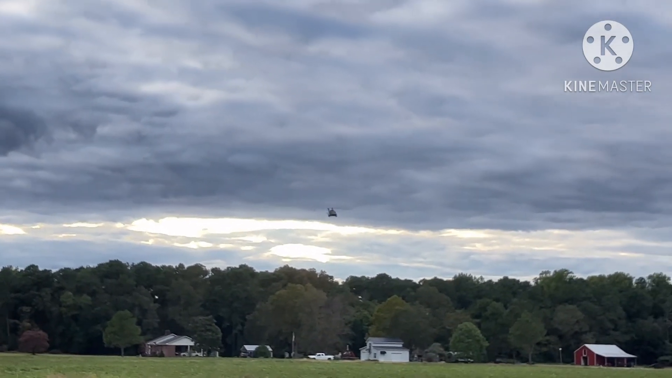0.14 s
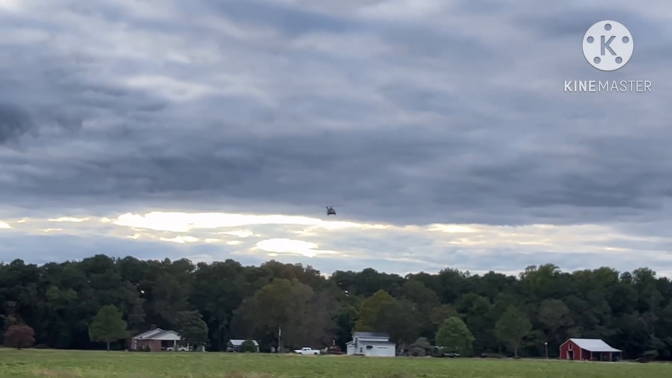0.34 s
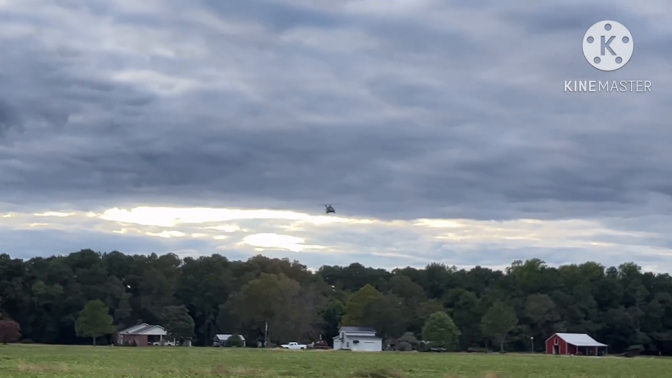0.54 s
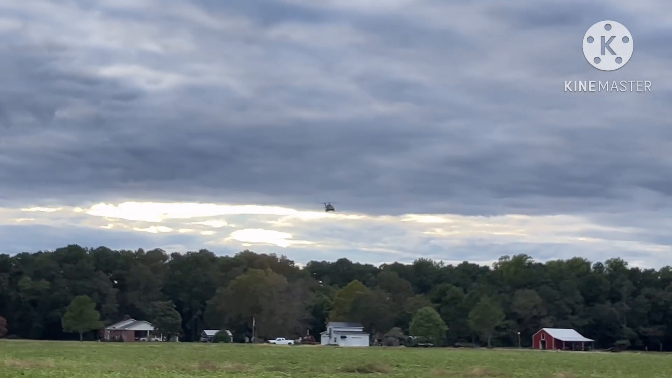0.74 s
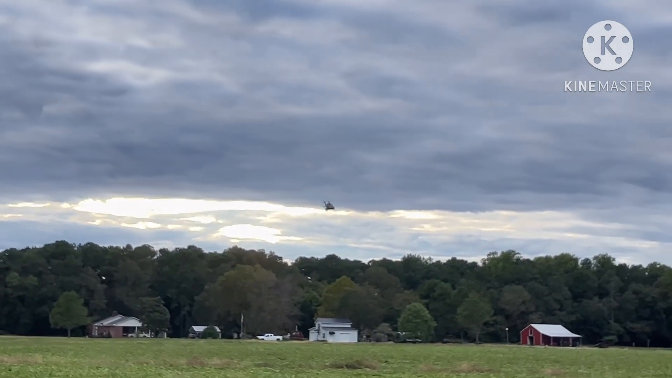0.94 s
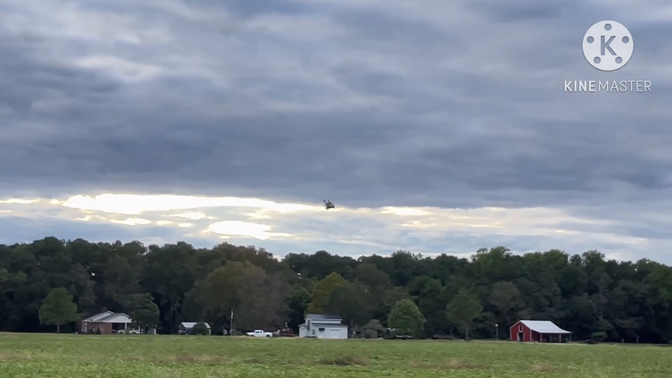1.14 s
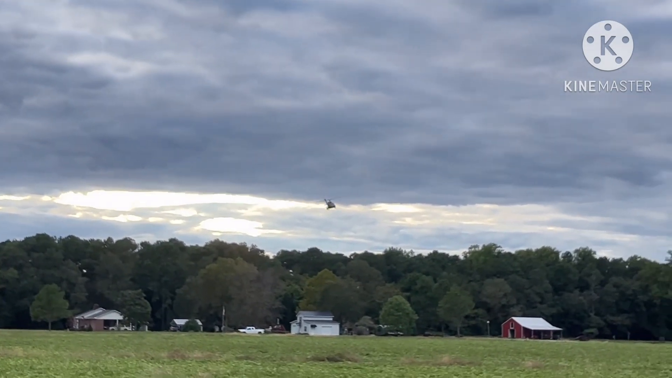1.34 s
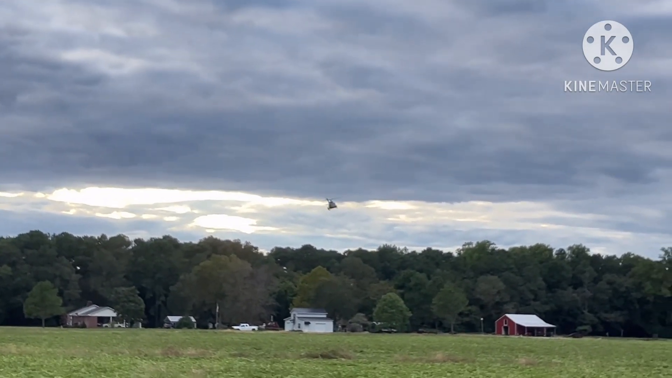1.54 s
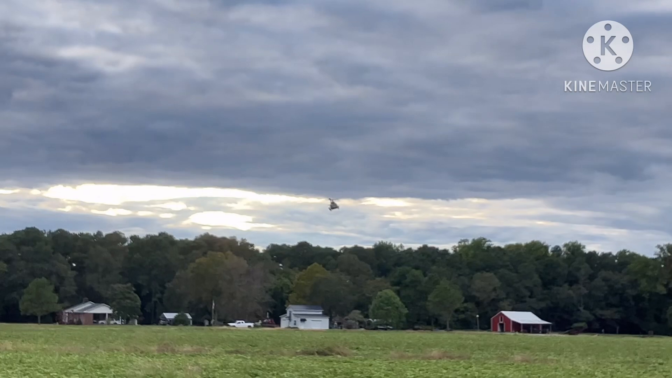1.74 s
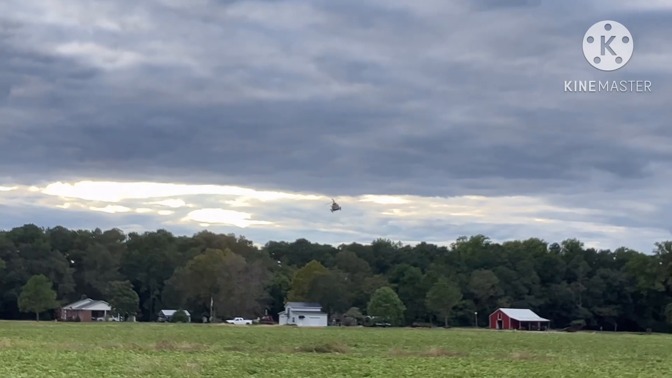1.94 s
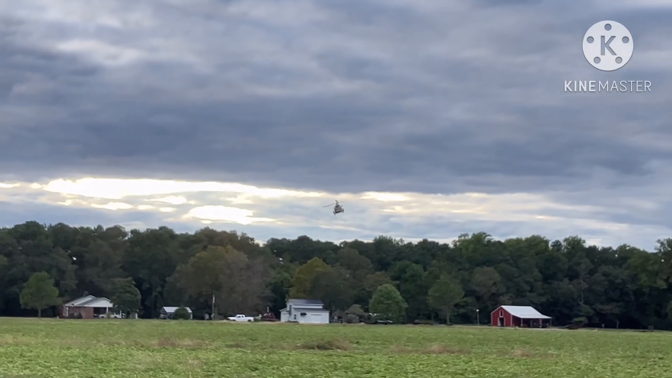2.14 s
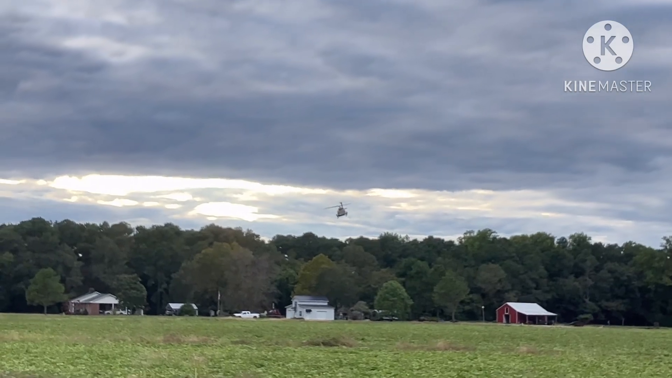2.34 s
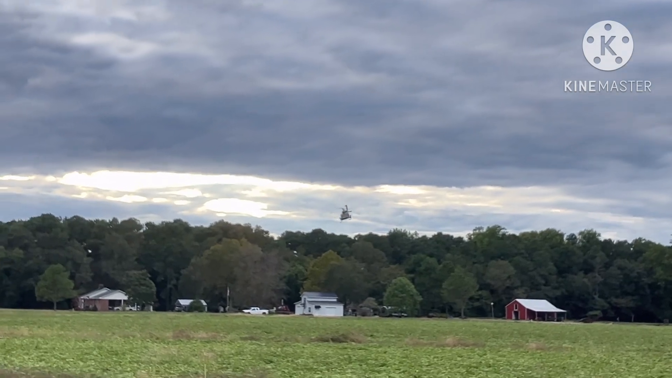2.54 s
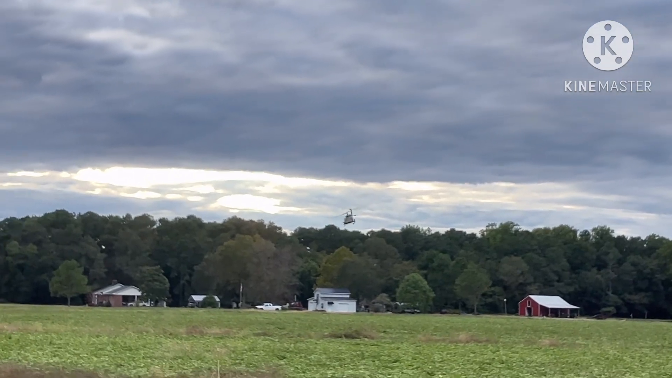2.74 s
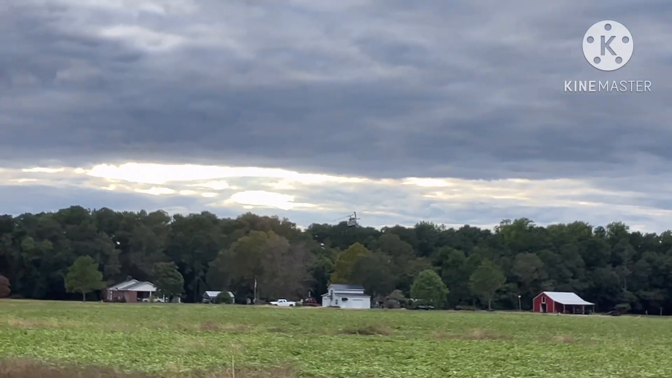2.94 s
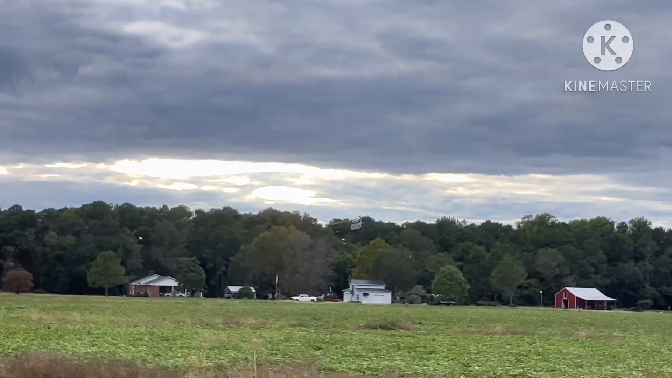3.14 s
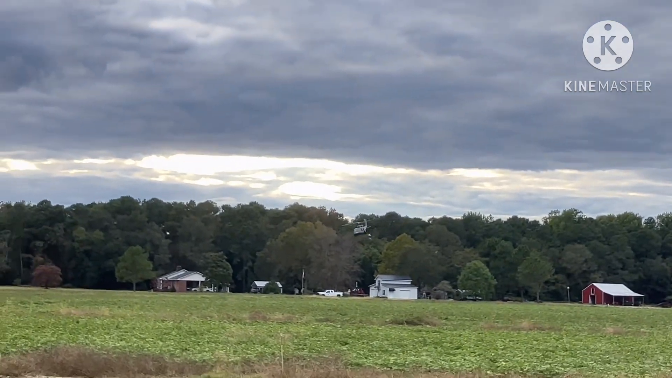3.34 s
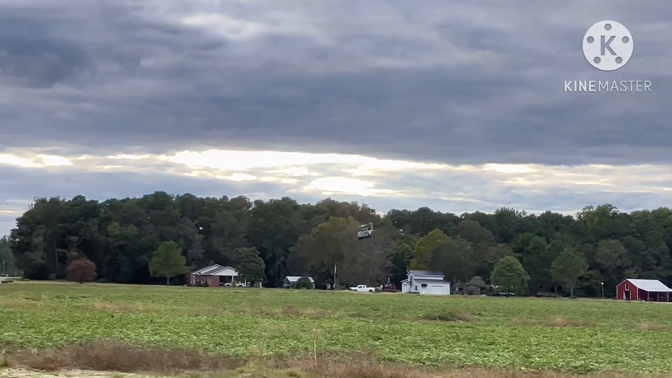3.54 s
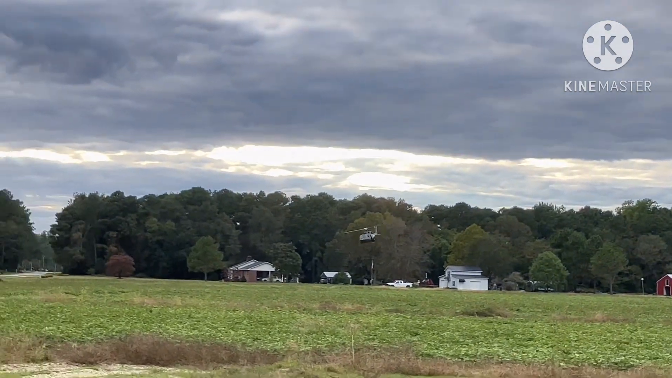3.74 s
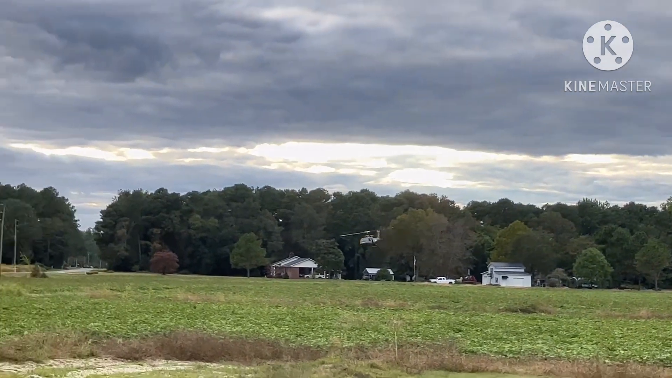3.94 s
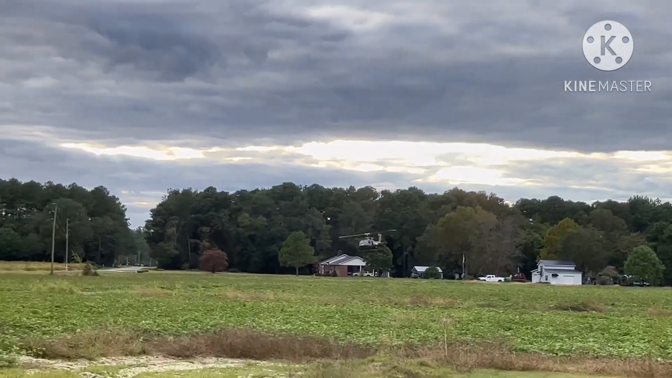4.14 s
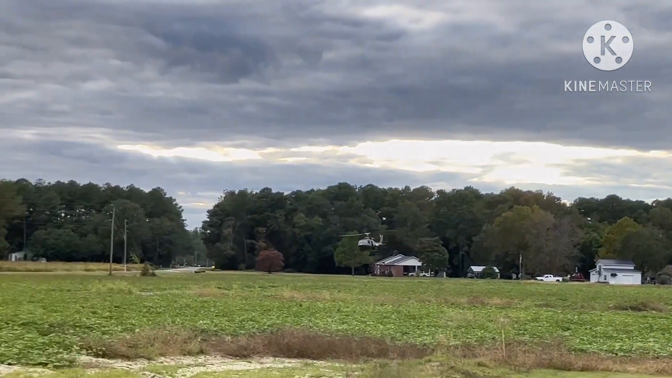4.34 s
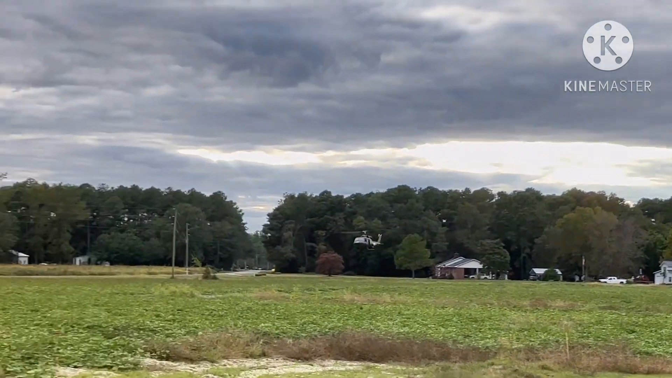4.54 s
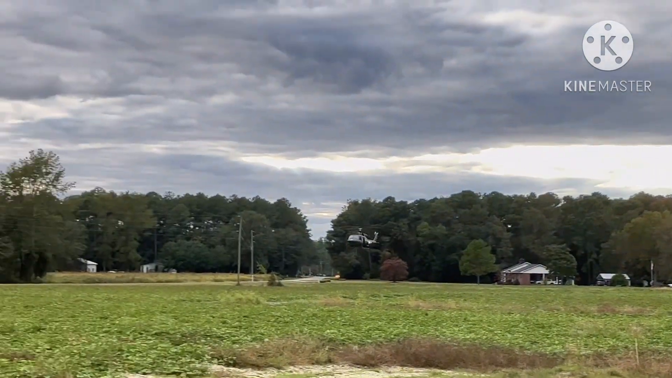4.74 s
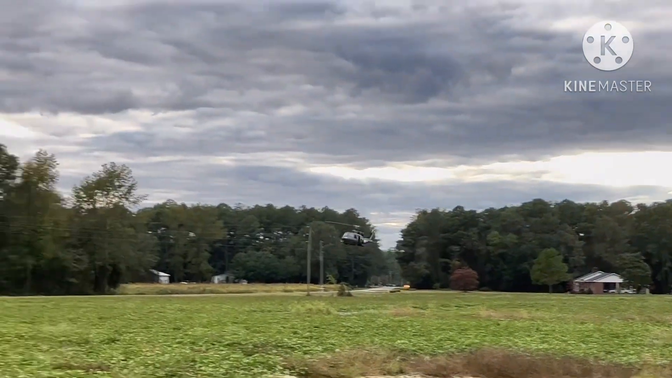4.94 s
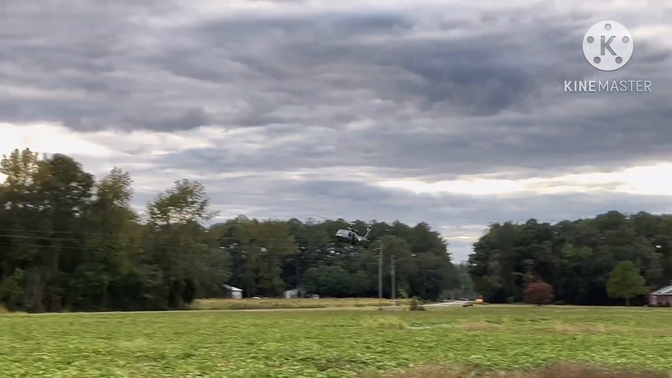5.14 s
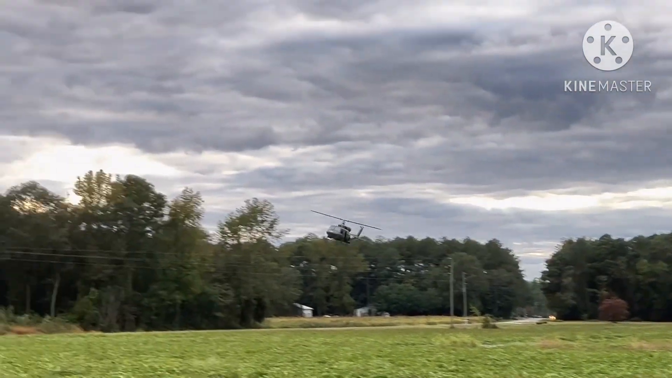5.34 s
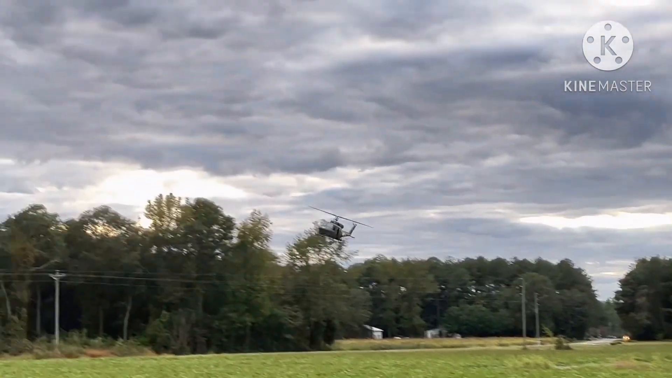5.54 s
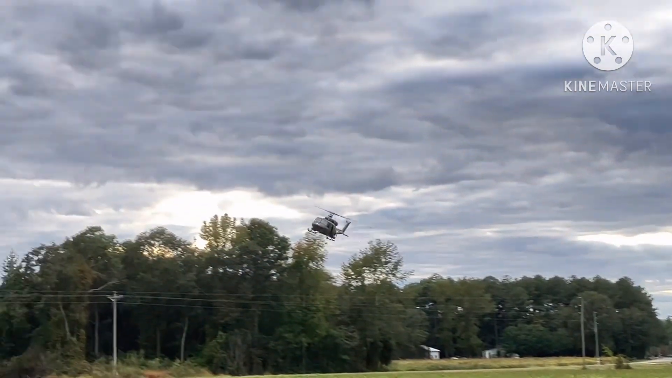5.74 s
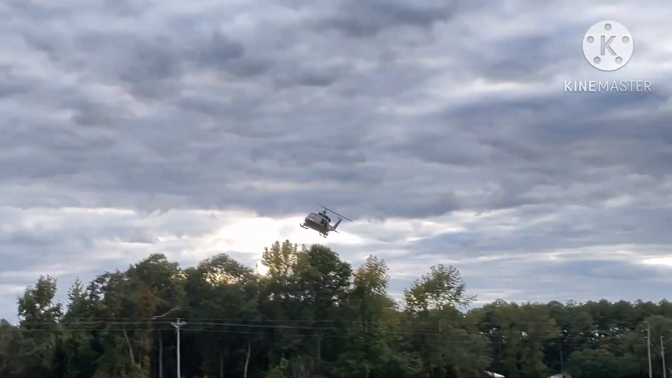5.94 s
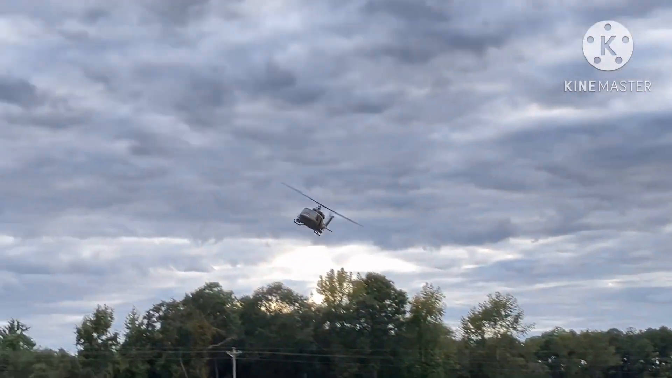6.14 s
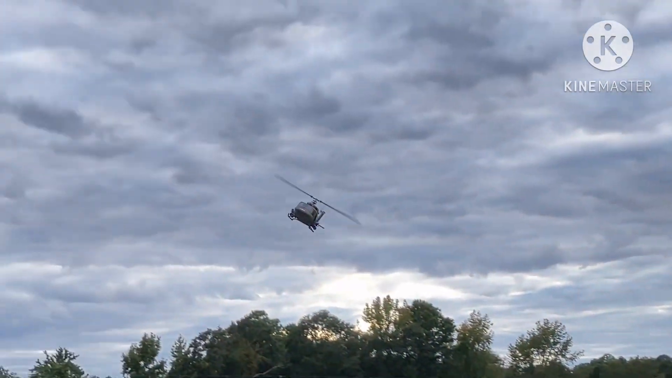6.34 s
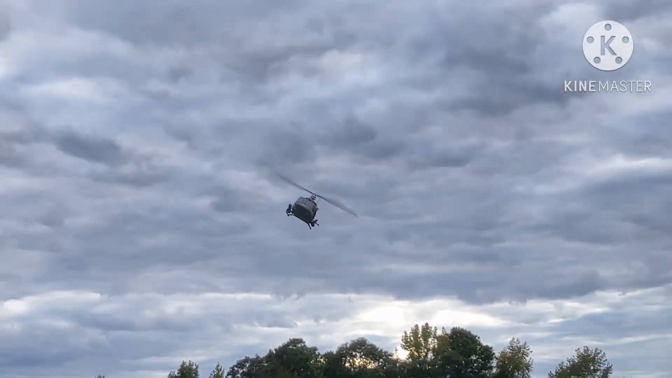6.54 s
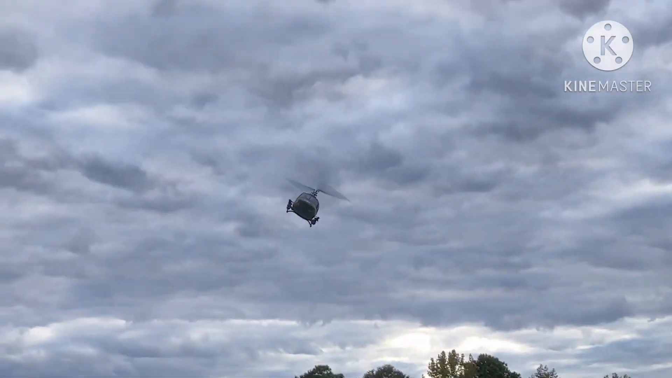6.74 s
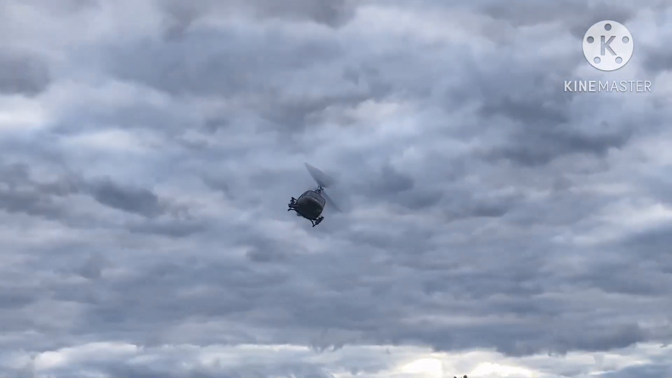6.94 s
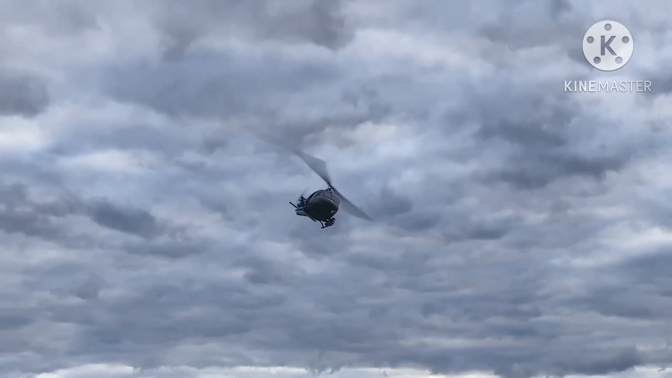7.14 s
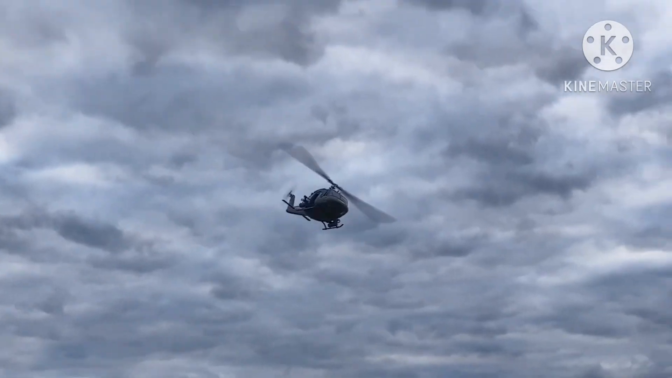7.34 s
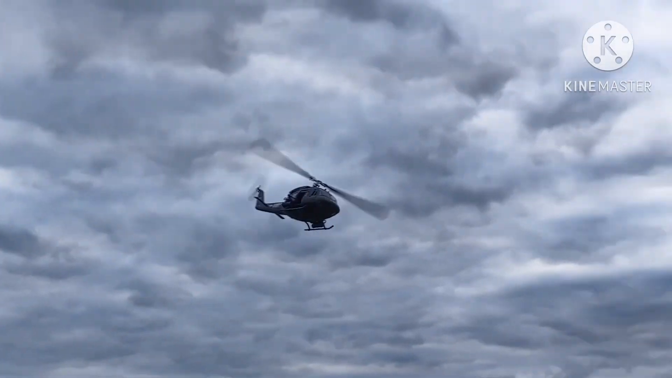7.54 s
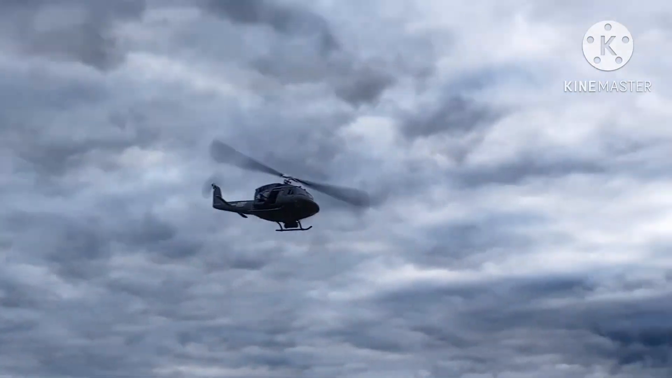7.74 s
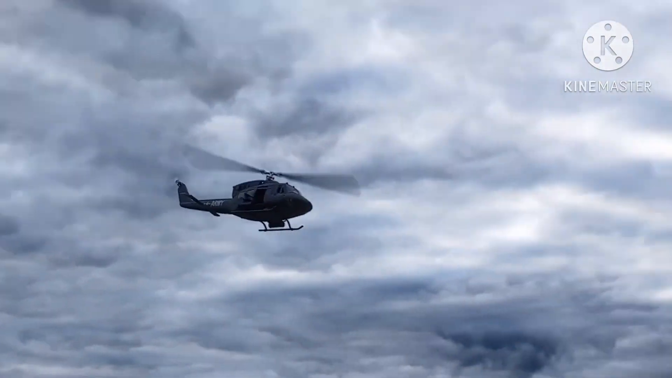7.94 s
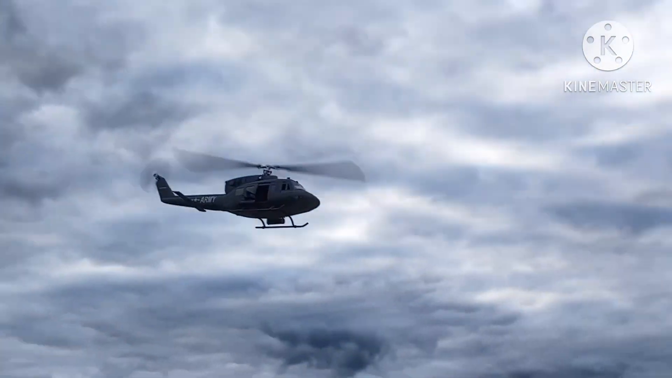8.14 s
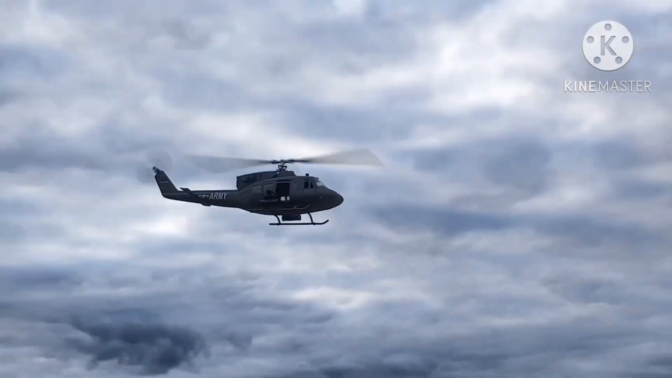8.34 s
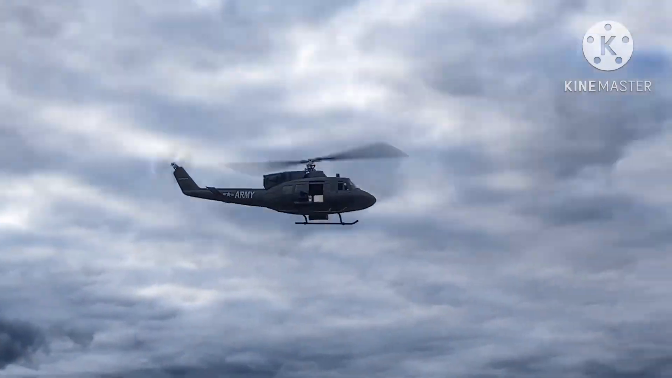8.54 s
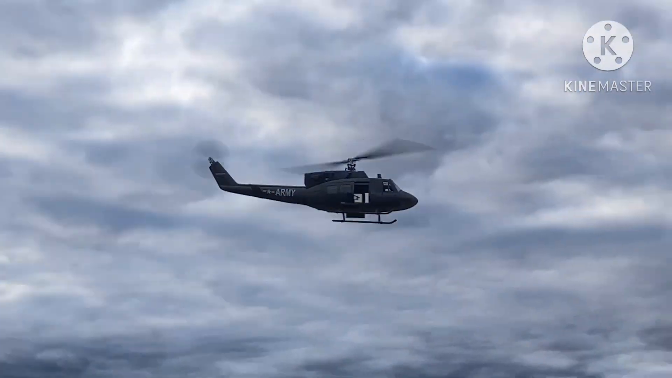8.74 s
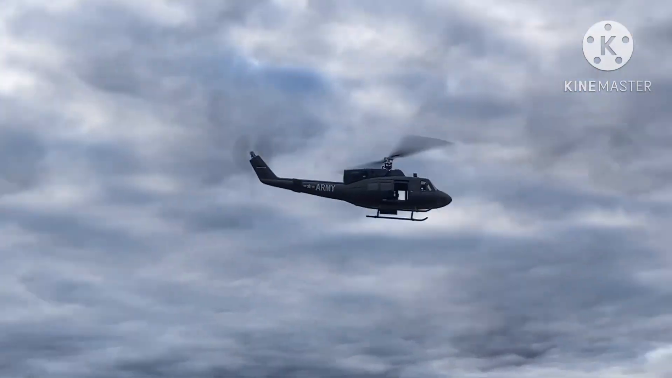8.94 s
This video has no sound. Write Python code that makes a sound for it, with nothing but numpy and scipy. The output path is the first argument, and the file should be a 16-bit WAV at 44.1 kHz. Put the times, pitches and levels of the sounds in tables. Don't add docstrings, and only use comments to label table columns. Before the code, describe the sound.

Outdoors, a distant small radio-controlled helicopter's steady motor whine and fluttering blade buzz grow steadily nearer, becoming harsh and airy as it sweeps past.

```python
import sys
import numpy as np
from scipy import signal
from scipy.fft import rfft, irfft
from scipy.io import wavfile
from scipy.ndimage import uniform_filter1d, map_coordinates

SR = 44100
rng = np.random.default_rng(int(sys.argv[2]) if len(sys.argv) > 2 else 0)


def volts_from_decibels(level):
    exponent = np.asarray(level, float) / 20
    return 10 ** exponent


def unload_audio(sound):
    columns = np.transpose(np.atleast_2d(sound))
    steps = np.round(np.clip(columns, -1, 1) * 32767)
    wavfile.write(sys.argv[1], SR, steps.astype(np.int16))


N = 396900
MOTOR, TAIL = 10.735, 4.5025

# (time [s], nearness [dB], side-on [0-1], motor load [0-1], grass echo delay [ms])
FLIGHT_PATH = [(0.0, 0, 0, 0.01, 1.44), (1.0, 1.2, 0, 0, 1.39), (2.0, 2, 0.02, 0.03, 1.33),
               (2.75, 2.5, 0.02, 0.03, 1.26), (3.5, 4, 0.03, 0.02, 1.08), (4.25, 5.5, 0.07, 0.01, 0.84),
               (4.75, 7, 0.05, 0.03, 0.92), (5.25, 8.5, 0.04, 0.3, 1.23), (5.5, 9.5, 0, 0.6, 1.4),
               (6.25, 10.5, 0, 0.62, 2.53), (6.75, 12, 0, 0.8, 3.12), (7.0, 12, 0.03, 0.98, 3.5),
               (7.5, 13, 0.31, 0.97, 4.135), (7.75, 12, 0.64, 0.9, 4.33), (8.0, 12.5, 0.81, 0.48, 4.35),
               (8.25, 12.5, 0.92, 0.3, 4.3), (8.6, 12.5, 0.98, 0.1, 4.44), (9.0, 12, 0.93, 0.15, 4.57)]


def in_time(rows):
    s, *columns = np.transpose(rows)
    return [np.interp(np.arange(N) / SR, s, c) for c in columns]


def at_hz(hz, points_hz, values):
    return np.interp(np.log(np.maximum(hz, 1)), np.log(points_hz), values)


def rms_one(x):
    return x / np.sqrt(np.mean(x ** 2) + 1e-20)


def drift(rate_hz):
    pole = np.exp(-200 * np.pi * rate_hz / SR)
    noise = rng.standard_normal(N // 100 + 802)
    slow = signal.lfilter([1], [1, -2 * pole, pole * pole], noise)[800:]
    return np.interp(np.arange(N) / 100, np.arange(len(slow)), rms_one(slow))


def breeze():
    # (frequency [Hz], density [dB per Hz])
    rumble_colour = [(25, -8), (60, 3), (100, -1), (160, -3.5), (400, -20), (2000, -26), (9000, -56)]
    # (time [s], peak [dB], pitch [Hz])
    bumps = [
        (1.19, -44, 70),
        (2.37, -38, 80),
        (2.83, -35, 85),
        (6.66, -30, 58),
        (8.97, -32, 55),
    ]
    hz = np.fft.rfftfreq(N, 1 / SR)
    spectrum = rfft(rng.standard_normal(N)) * volts_from_decibels(at_hz(hz, *np.transpose(rumble_colour)))
    out = rms_one(irfft(spectrum, N)) * volts_from_decibels(-56 + 4.5 * drift(2.9))
    t = np.arange(N) / SR
    for s, peak_db, pitch_hz in bumps:
        swell = np.exp(-((t - s) / 0.013) ** 2)
        out += volts_from_decibels(peak_db) * swell * np.cos(2 * np.pi * pitch_hz * (t - s))
    return out


def voice_levels():
    voices = {"blade beat": (-45.5, 1.03, 0.5, -0.1), "blade octave": (-47.5, 0.99, -6.5, -6),
              "motor": (-43, 0.4824, .6, 14.5), "motor octave": (-52, 0.62, 4.5, -1),
              "tail beat": (-55.5, 1.1567, 11, 5), "tail 2nd": (-54.5, .8, 16, 0.1),
              "tail 3rd": (-49, .7, 7, 0.5), "whine": (-61, .05, 1, -2.5), "tail 4th": (-60, 1.01, 9, -2),
              "tail 5th": (-65, 1.2, 13, -1.3), "tail mesh": (-60, 1.2265, -0.5, 0.4),
              "pinion mesh": (-54.5, .8, 3, -1.3), "sum tone": (-49.5, 0.31, 10.5, -2.5),
              "tail comb": (-57, 0.68, 4, 0.1), "low rush": (-56, 1.02, 10, 0.5),
              "mid rush": (-49.7, .95, 7, 0.4), "high rush": (-51, 1.0162, 10, 0.1),
              "top rush": (-56, 1.3065, 10, -0.9)}
    sweeps = {"blade octave": [(5.9, 4, .6), (7.1, -6, .6), (8.45, -7, .15)], "sum tone": [(3.75, -8, .75)],
              "tail beat": [(3.7, 5, 1.1), (5.8, -5, .4)], "tail 2nd": [(7.2, -10.5, 0.4), (7.65, -5, .25)],
              "tail 3rd": [(5.8, 3.5, .6), (7.9, -3.5, 0.23)], "whine": [(4.9, -11, .25), (6.6, 13, .4),
              (7.25, 10, .3), (8.17, 28.5, .55), (9.0, -9, .15)], "tail 4th": [(4.0, 6.5, 2.1),
              (5.95, -9, .15), (6.5, 5, .35)], "tail 5th": [(3.6, 8.5, 1.9), (6.5, 5, 0.57),
              (7.0, -11, .12), (8.0, -9, .35)], "tail mesh": [(3.7, 6, 1.5), (6.95, -8, 0.42),
              (8.2, 6, 0.23)], "pinion mesh": [(0.5, -12, 1.5), (7.6, 5, 0.28), (8.25, -8, .3)],
              "low rush": [(3.6, 5, 1.9)]}
    edge_steepness = 3.7
    near_db, side_on, load, _ = (c[::64] for c in in_time(FLIGHT_PATH))
    t = np.arange(0, N, 64) / SR
    levels = []
    for name, (far_db, share, side_db, load_db) in voices.items():
        db = far_db + share * near_db + side_db * side_on + load_db * load
        for s, swell_db, half_s in sweeps.get(name, []):
            db = db + swell_db * np.exp(-abs((t - s) / half_s) ** edge_steepness)
        levels.append(np.interp(np.arange(N) / SR, t, db))
    return levels


def tail_comb(turn, level_db):
    # (multiple of the shaft [1], level [dB])
    rattle = [(15, -8), (22, -2.5), (30, -7), (36, -4), (40, 4.5), (46, -3.5), (58, -4), (66, -6)]
    scatter_db, waver_db = 3, 2.0
    steps = np.arange(2049) / 2048
    tail_turns = TAIL * turn / (2 * np.pi)
    out = np.zeros(N)
    for first in (15, 16, 17):
        k = np.arange(first, 67, 3)[:, None]
        db = np.interp(k, *np.transpose(rattle)) + scatter_db * rng.standard_normal(k.shape)
        partials = volts_from_decibels(db) * np.sin(2 * np.pi * (k * steps + rng.random(k.shape)))
        cycle = partials.sum(axis=0)
        out += volts_from_decibels(waver_db * drift(1.5)) * np.interp(tail_turns % 1, steps, cycle)
    return volts_from_decibels(level_db - 10) * out


def blade_rush(turn, levels):
    # (frequency [Hz], density [dB per Hz])
    rush_colour = [(90, -16), (160, -5.5), (260, 1.5), (450, -8.5), (650, -1), (1250, 0), (1600, -9),
                   (1850, -4), (2050, -13.5), (2400, -2.5), (3500, -12), (9500, -10), (12300, -22.5),
                   (15000, -21)]
    # (time [s], once a turn [dB], twice a turn [dB])
    swish = [(0, 1.5, -2), (4, 0, 2.2), (6, 1.2, -0.5), (7, 0.9, 2.5), (7.7, 1.8, 1), (9, 1, -2.5)]
    hz = np.fft.rfftfreq(N, 1 / SR)
    noise = rfft(rng.standard_normal(N)) * volts_from_decibels(at_hz(hz, *np.transpose(rush_colour)))
    once_db, twice_db = in_time(swish)
    swish_db = once_db * np.cos(turn + 0.5) + twice_db * np.cos(2 * turn) + np.cos(TAIL * turn)
    crossovers_hz = [420, 600, 1700, 2300, 5200, 6900, 9500, 12500]
    place = at_hz(hz, crossovers_hz, [0, 1, 1, 2, 2, 3, 3, 4])
    air_db = 0.77 * np.minimum(levels[-1] + 42, 0)
    levels = levels + [levels[-1] + air_db]
    gust = drift(18.5)
    out = np.zeros(N)
    ranges = [(1.6, 0.66), (0.46, 0.41), (0.59, 0.49), (0.55, 0.8), (1.1, 1.3)]   # (swish share, flutter dB)
    for k, (share, flutter_db) in enumerate(ranges):
        power_share = np.clip(1 - abs(place - k), 0, 1)
        band = rms_one(irfft(noise * np.sqrt(power_share), N))
        flutter = 0.28 * gust + 0.9 * drift(17.0)
        out += band * volts_from_decibels(levels[k] + share * swish_db + flutter_db * flutter)
    return out


def drive_train(turn, levels):
    multiples = [(2, 0, 0), (4, 0, 0), (0, 0, 1), (0, 0, 2), (0, 2, 0), (0, 4, 0), (0, 6, 0), (0, 8, 0),
                 (0, 10, 0), (0, 17, 0), (0, 0, 10), (0, 40, 0), (3, 0, 0), (6, 0, 0), (0, 0, 40),
                 (-1, 0, 1), (2, 0, 1), (0, 2, 1), (-.5, 2, 1), (2, 0, 2), (4, 0, 2), (0, 0, 5), (0, 0, 11),
                 (0, 18, 0), (0, 19, 0), (0, 20, 0), (0, 39, 0), (0, 41, 0), (2, 1, 0), (0, 3, 0)]
    follows = [0, 1, 2, 3, 4, 5, 6, 8, 9, 10, 11, 7, 0, 14, 17, 2, 2, 12, 12, 3, 3, 3, 11, 16, 16, 16, 7, 7,
               5, 5]
    # (level [dB], unsteadiness [dB])
    line_levels = [(0, 0.5), (0.35, 0.3), (-0.04, .3), (0.5, 0.2), (1.5, .3), (0.3, 0.3), (-0.6, -0.2),
                   (-0.5, .8), (1.1, 1.2), (0.8, 2), (-1.5, 1), (1, 0.3), (-19.5, 3), (-8.5, 1.5),
                   (-25, 1.5), (-21, 1.5), (-23, 2), (-1.8, .8), (-7, 2.5), (-8, 1), (-10, 4), (-13, 0.5),
                   (-4.5, 1.2), (-13, 2), (-13, 1.5), (-11.5, 1.5), (-13, 2.1), (-9.5, 2.1), (-11.5, 2),
                   (-14.5, 2.5)]
    out = np.zeros(N)
    rocking = [drift(2.5) for _ in range(8)]
    for j, (shafts, voice, (line_db, waver_db)) in enumerate(zip(multiples, follows, line_levels)):
        rotor, tail, motor = shafts
        order = rotor + tail * TAIL + motor * MOTOR
        shake_rad = 0.016 * np.sqrt(order) * rocking[j % 7] + 2 * np.pi * rng.random()
        level_db = levels[voice] + line_db + waver_db * rocking[-j % 8]
        out += np.sqrt(2) * volts_from_decibels(level_db) * np.sin(order * turn + shake_rad)
    return out


def over_grass(x):
    near_db, _, _, delay_ms = in_time(FLIGHT_PATH)
    lag_rad = 1.42 - 0.1 * near_db
    strength = np.clip(0.68 - 0.014 * near_db, 0, 1)
    treble = np.clip(0.75 * np.exp(-near_db / 6.5), 0, 1)
    grazing_cut_hz, steep_cut_hz = 7000, 1500
    bright = signal.lfilter(*signal.butter(1, grazing_cut_hz, fs=SR), x)
    dull = signal.lfilter(*signal.butter(1, steep_cut_hz, fs=SR), x)
    mirrored = treble * bright + (1 - treble) * dull
    turned = (signal.hilbert(mirrored) * np.exp(-1j * lag_rad)).real
    late = map_coordinates(turned, [np.arange(N) - delay_ms * SR / 1000], order=3, mode="nearest")
    return x + strength * late


def two_ports(x):
    # (frequency [Hz], gain [dB], half width [Hz])
    port_colour = [(455, -1.2, 40), (5050, -1.5, 200), (6850, -3, 490), (8520, 2.5, 740)]
    # (frequency [Hz], lead ahead, half aside, aside [rad], left-right [dB])
    port_leads = [(90, 0, 0, 0, -.2), (200, 0, 0, 0, .6), (1200, 0, 0, .05, .2), (1800, -.05, 0, .5, -1),
                  (2500, .05, 1, 1.6, -.8), (3200, .05, 1.45, 2, .6), (3900, .05, .15, 2.6, -.3),
                  (4600, .05, .15, 2.1, -.6), (5250, 1.6, 1.1, 4.1, -3.5), (5950, 2.3, 2.4, 4.3, -7),
                  (6600, .1, 1.6, 3.6, -1.5), (7000, 0, 1.2, 4.9, .3), (7040, 0, -1.1, -1.3, .6),
                  (7500, 0, -.6, -.8, .8)]
    # (time [s], bearing [0 ahead - 1 aside])
    bearing_path = [(0, 0.85), (1.5, 0.89), (3, 0.73), (4, 0.62), (5.2, 0.62), (6.4, 0.59), (6.65, 0.55),
                    (6.85, .01), (7.6, .01), (7.8, 0.97), (8.5, 0.99), (9, 0.78)]
    # (frequency [Hz], lead [rad])
    high_lead = [(7500, 0), (8000, -1.6), (8950, -3.1), (9600, -3.18), (10100, -4.5), (11000, -6.1),
                 (12200, -6.5), (12800, -8.4), (13200, -9.38), (14150, -9.5), (15100, -12.4)]
    # (frequency [Hz], level [dB])
    scatter = [(60, -19), (1000, -20), (1600, -14), (5500, -12), (8500, -28)]
    hz, s, frames = signal.stft(x, SR, nperseg=1024)
    colour_db = sum(db * np.exp(-((hz - at) / half_hz) ** 2) for at, db, half_hz in port_colour)
    frames = frames * volts_from_decibels(colour_db)[:, None]

    port_hz, *leads, tilt_db = np.transpose(port_leads)
    bearing = 2 * np.clip(np.interp(s, *np.transpose(bearing_path)), 0, 1)
    low_rad = 0
    for k, lead in enumerate(leads):
        nearby = np.clip(1 - abs(bearing - k), 0, 1)
        low_rad = low_rad + np.outer(at_hz(hz, port_hz, lead), nearby)
    fade_from_hz, fade_to_hz = high_lead[0][0], high_lead[1][0]
    fading = np.clip((fade_to_hz - hz) / (fade_to_hz - fade_from_hz), 0, 1)[:, None]
    high_rad = at_hz(hz, *np.transpose(high_lead))[:, None]
    half = np.exp(0.5j * (low_rad * fading + high_rad))
    half = half * volts_from_decibels(at_hz(hz, port_hz, tilt_db) / 2)[:, None]

    re, im = uniform_filter1d(rng.standard_normal((2, *frames.shape)), size=18, axis=2) * 3
    scatter_gain = volts_from_decibels(at_hz(hz, *np.transpose(scatter)))
    unlike = (re + 1j * im) * np.outer(scatter_gain, 0.69 + 0.12 * bearing)
    ports = np.stack([frames * half * (1 + unlike), frames / half * (1 - unlike)])
    return signal.istft(ports, SR, nperseg=1024)[1][:, :N]


def scene():
    # (time [s], speed [turns per s])
    rotor_speed = [(0.0, 30.669), (0.5, 30.622), (1.0, 30.606), (1.5, 30.698), (2.5, 30.953), (3.0, 30.961),
                   (3.5, 30.898), (4.0, 30.901), (4.5, 30.726), (5.0, 30.707), (5.5, 30.639), (6.0, 30.558),
                   (6.5, 30.525), (7.0, 30.532), (7.5, 30.484), (8.0, 30.187), (8.5, 30.028), (9.0, 29.842)]
    turn = 2 * np.pi * np.cumsum(in_time(rotor_speed)[0]) / SR
    levels = voice_levels()
    machine = drive_train(turn, levels) + blade_rush(turn, levels[-4:]) + tail_comb(turn, levels[-5])
    return two_ports(over_grass(machine) + breeze())


def band_limit(x):
    return signal.sosfilt(signal.butter(12, 17060, fs=SR, output="sos"), x)


def record(dry):
    dry = signal.sosfilt(signal.butter(2, 30, "high", fs=SR, output="sos"), dry)
    dry = signal.sosfilt(signal.ellip(12, 0.5, 75, 15800, fs=SR, output="sos"), dry)
    return band_limit(dry)


dry = scene()
out = record(dry)
unload_audio(out)
```